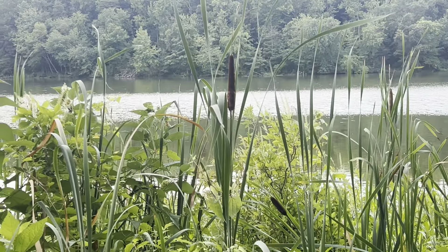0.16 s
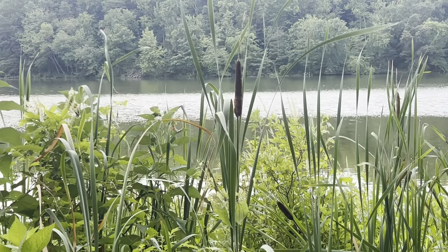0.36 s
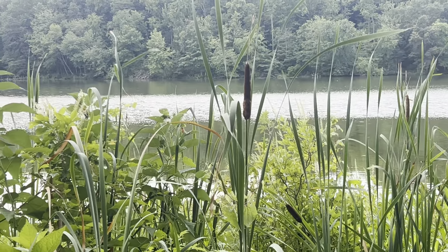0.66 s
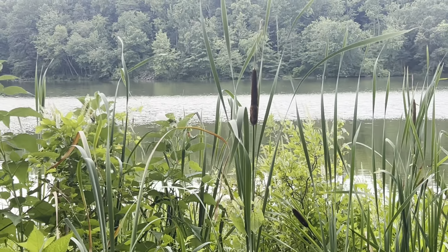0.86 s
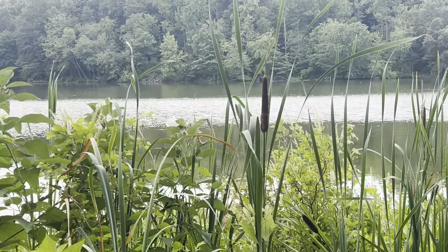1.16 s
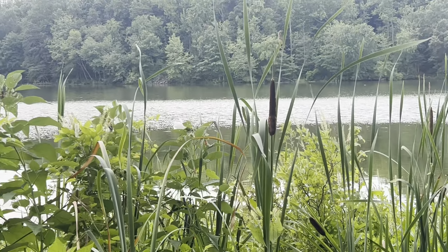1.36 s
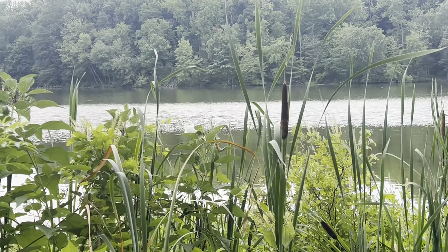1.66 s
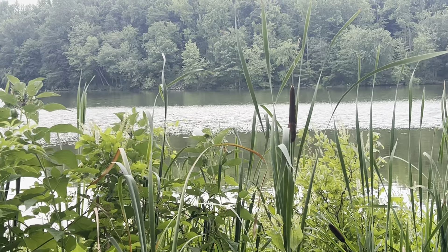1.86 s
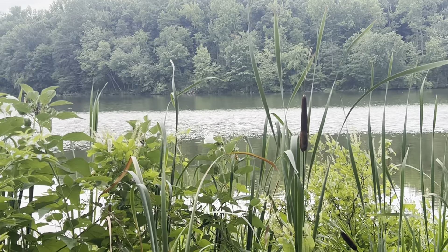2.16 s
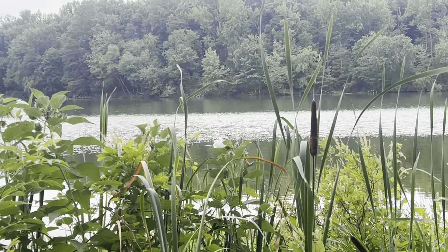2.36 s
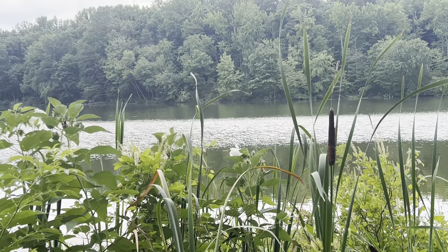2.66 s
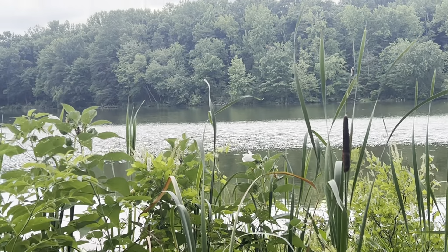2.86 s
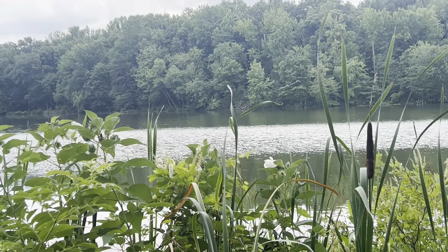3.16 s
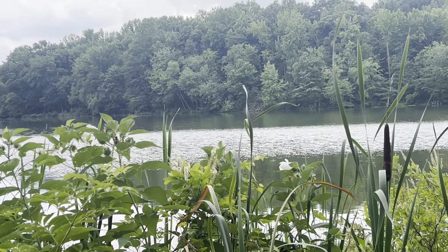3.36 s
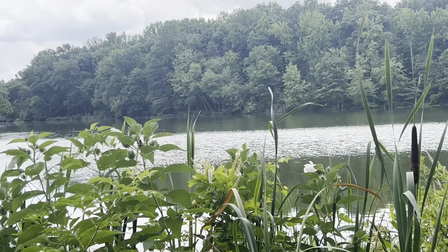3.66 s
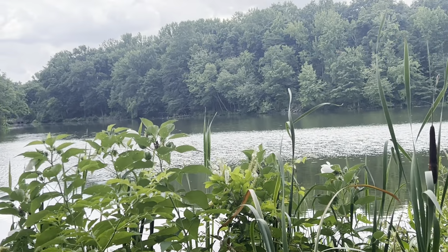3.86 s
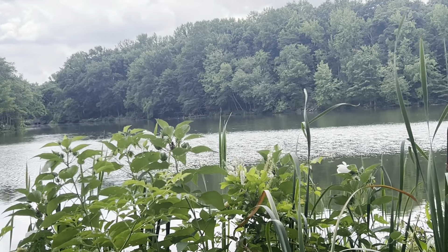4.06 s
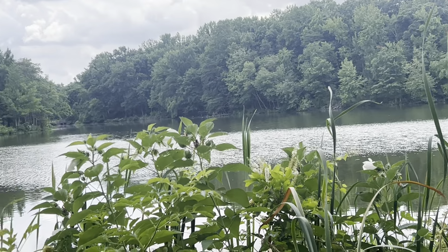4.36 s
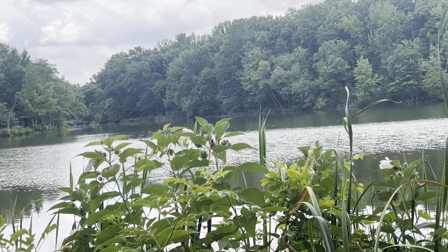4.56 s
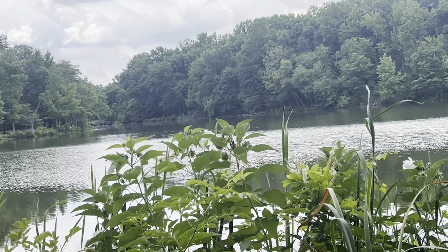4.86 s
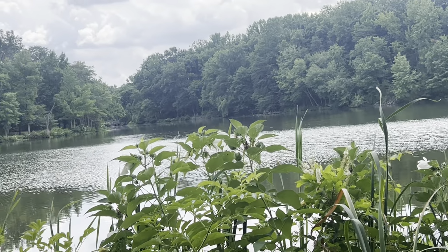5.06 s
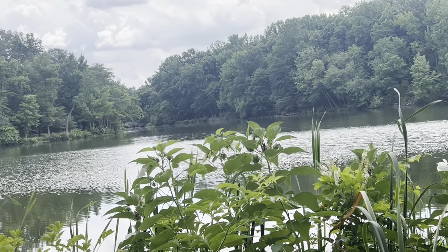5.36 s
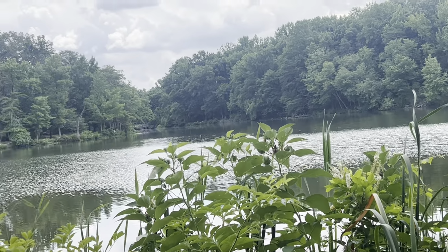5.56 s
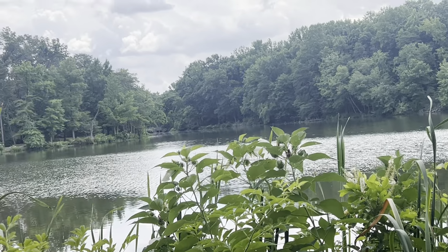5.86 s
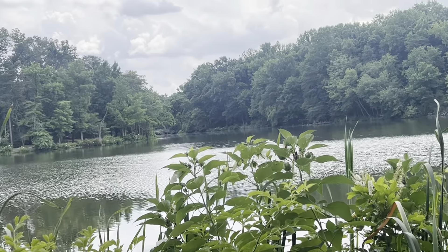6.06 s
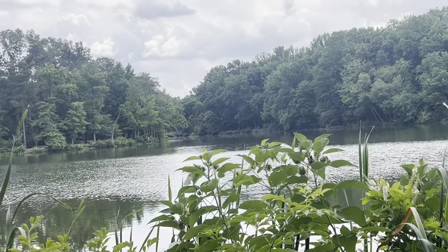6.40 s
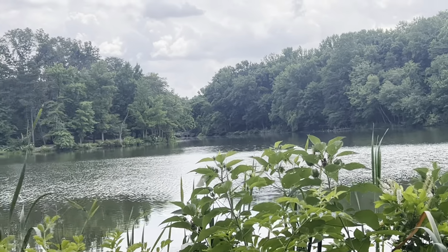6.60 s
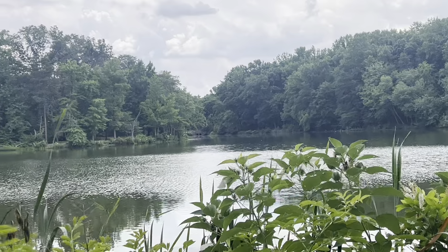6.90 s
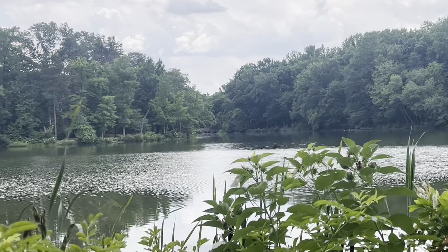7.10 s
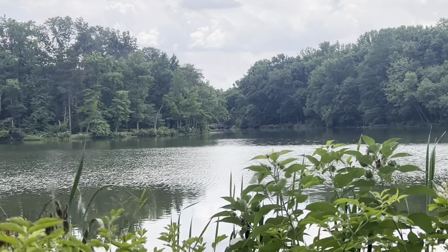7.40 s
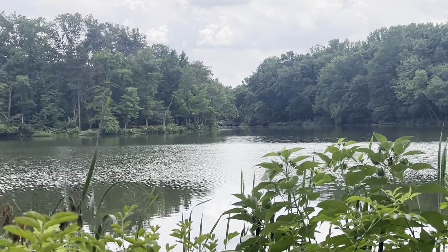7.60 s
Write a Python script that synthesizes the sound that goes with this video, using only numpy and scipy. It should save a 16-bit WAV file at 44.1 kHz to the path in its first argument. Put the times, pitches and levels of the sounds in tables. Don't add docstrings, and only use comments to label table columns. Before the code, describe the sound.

Two meadow katydids trade quick ticks and long, high dry buzzes beside a lake, over a steady cricket trill and low distant traffic rumble.

```python
import sys
import numpy as np
from scipy import signal
from scipy.fft import rfft, irfft
from scipy.io import wavfile
from scipy.ndimage import uniform_filter1d

SR = 44100
rng = np.random.default_rng(int(sys.argv[2]) if len(sys.argv) > 2 else 0)


def invert_db(level):
    return 10 ** (np.asarray(level, dtype=float) / 20)


def to_wav(sig):
    pcm = np.clip(np.atleast_2d(sig), -1, 1) * 32767
    pcm = np.round(pcm).astype(np.int16)
    wavfile.write(sys.argv[1], SR, pcm.T)


N = 341334


def evened(x):
    return x / np.sqrt(np.mean(x ** 2) + 1e-20)


def read(points, hz):
    f, value = np.transpose(points)
    return np.interp(np.log(hz + 1), np.log(f + 1), value)


def along(rows):
    s, *columns = np.transpose(rows)
    return [np.interp(np.arange(N) / SR, s, c) for c in columns]


def gate(start, end, edge_s):
    t = np.arange(N) / SR
    return np.clip(np.minimum(t - start, end - t) / edge_s + .5, 0, 1)


def resonate(x, hz, width):
    turn = np.exp(2j * np.pi * np.cumsum(hz * np.ones(len(x))) / SR)
    r = np.exp(-np.pi * width / SR)
    smooth = signal.lfilter([(1 - r) ** 2], [1, -2 * r, r * r], x / turn + 1e-18)
    return 2 * (turn * smooth).real


def coloured(x, points):
    return irfft(rfft(x) * invert_db(read(points, np.fft.rfftfreq(N, 1 / SR))), N)


def slow(per_s):
    knots = rng.standard_normal(int(N / SR * per_s) + 2)
    return evened(np.interp(np.arange(N), np.linspace(0, N, len(knots)), knots))


def reeds(x, t60, wet_db, count=3):
    t, out = np.arange(6000) / SR, x + np.zeros((2, 1))
    for k in range(count):
        tail = rng.standard_normal(6000) + .07 * rng.standard_normal((2, 6000))
        tail = tail * invert_db(-60 * t / t60) * np.minimum(t / 0.0086, 1)
        tail = tail / np.linalg.norm(tail[0])
        turn_gain = np.sqrt(2 / count) * np.cos(np.pi * (7 * np.arange(N) / SR + k / count))
        out += invert_db(wet_db) * signal.oaconvolve((x * turn_gain)[None], tail, axes=1)[:, :N]
    return out


# start_s, peak_db
TICKS = [(0.9015, -27.5), (0.9707, -27), (1.036, -27), (1.0919, -26), (1.1373, -32), (2.493, -35.5),
         (2.5441, -41.5), (2.5995, -44), (2.6898, -47), (2.7317, -39), (2.8, -36), (2.8704, -34.5),
         (2.9377, -34.5), (3.8655, -26.5), (3.9335, -24.5), (3.9985, -25), (4.0568, -26.5), (4.108, -28),
         (5.6516, -37.5), (5.7197, -36.5), (5.7844, -35), (5.8495, -39), (6.7316, -39), (6.7915, -26.5),
         (6.8605, -24.5), (6.9264, -25.5), (6.988, -24), (7.032, -30)]
# pitch_hz, width_hz, level_db, lag_turns within the stroke, far_singer_difference_db
WING = [(9040, 330, -24.5, 0.38, 0), (11200, 3140, -1.5, 0.028, -1.5), (12660, 1680, -1.5, 0.078, 0),
        (13500, 1210, 2, -0.059, -0.5), (13940, 910, 3, -0.076, -2), (15050, 1070, -1, -0.0081, 2),
        (15740, 300, -8.5, 0.12, 0)]
# start_s, end_s, effort_db, stroke_place_turns at the start
NEAR_BUZZES = [
    (1.158, 2.423, -38.5, -0.42),
    (4.122, 5.172, -40.5, .46),
    (7.059, 8.2, -36, -0.095),
]
# start_s, end_s, effort_db, stroke_place_turns at the start
FAR_BUZZES = [
    (-.05, 0.902, -46.5, -0.43),
    (2.966, 3.754, -43.5, 0.19),
    (4.695, 5.56, -51.5, 0.33),
    (5.947, 6.64, -42, 0.062),
]
# delay_s, share_gain
ECHOES = [(.0007, .2), (.0023, -.35), (.0031, .35), (.0052, .3), (.0077, -.25), (.011, .2)]


def katydids():
    teeth = (rng.random(N) < 11000 / SR) * rng.standard_normal(N)
    uneven = invert_db(0.5 * slow(60))
    ticks = lone_strokes()
    # swell dB, swell s, tiring dB, tiring s
    buzzes = [buzz(*row, per_s=46.6, shape=(6.3, 0.075, 3.1, .09), depth_db=5.5, far=False)
              for row in NEAR_BUZZES]
    buzzes += [buzz(*row, per_s=50, shape=(9.1, 0.17, 5, 0.074), depth_db=6.5, far=True)
               for row in FAR_BUZZES]
    out = np.zeros(N)
    share = np.sqrt(sum(invert_db(2 * w[2]) for w in WING))
    for k, (hz, width, db, lag, far_db) in enumerate(WING):
        drive = ticks * invert_db(0.95 * (hz - 13000) / 1000)
        for effort, turns, depth_db, far in buzzes:
            strokes = evened(invert_db(depth_db * np.cos(2 * np.pi * (turns - lag))))
            drive += effort * invert_db(far * far_db) * strokes
        ring = evened(resonate(teeth * uneven, hz, width))
        out += (-1) ** k * invert_db(db) / share * drive * ring
    out = out + sum(part * np.roll(out, round(s * SR)) for s, part in ECHOES)
    return invert_db(-1.5) * reeds(out, .07, -9.5)


def lone_strokes():
    t, ticks = np.arange(2600) / SR, np.zeros(N)
    rise_s, hold_s, fall_db_per_s = .005, 0.0031, 1000
    shape = np.minimum(t / rise_s, 1) * invert_db(-fall_db_per_s * np.maximum(t - rise_s - hold_s, 0))
    for s, db in TICKS:
        part = ticks[round((s - .004) * SR):][:len(t)]
        part += invert_db(db - 8.0) * shape[:len(part)]
    return ticks


def buzz(start, end, db, turn, per_s, shape, depth_db, far):
    t = np.arange(N) / SR
    since, left = np.maximum(t - start, 0), np.maximum(end - t, 0)
    swell_db, swell_s, tire_db, tire_s = shape
    effort_db = db - 1.5 - swell_db * np.exp(-since / swell_s) - tire_db * np.exp(-left / tire_s)
    tired_per_s, tired_s = 0.76, 0.24
    turns = turn + per_s * since - tired_per_s * np.maximum(tired_s - left, 0)
    return invert_db(effort_db) * gate(start, end, 0.031), turns, depth_db, far


# time_s, effort_db, lead_strokes ahead of an even beat
TRILL = [(0, -52.5, -0.12), (.75, -54.5, -0.09), (1.5, -55.5, 0.019), (2.3, -52.5, -0.082),
         (2.95, -55, -0.14), (3.6, -51, -0.072), (4.2, -52.5, -0.066), (5.3, -51, -0.1),
         (6.2, -54.5, -0.18), (7, -54, 0.022), (7.74, -55.5, -.1)]
# start_s, end_s, level_db against the first
ANSWERS = [
    (0.606, 1.75, -7),
    (2.7, 3.2, -7),
    (6.2, 6.75, -3),
    (7.15, 7.9, -0.5),
]


def cricket():
    effort_db, ahead = along(TRILL)
    turns = 16.1 * np.arange(N) / SR + ahead + 0.038 * slow(9)
    answer = sum(invert_db(db) * gate(start, end, 0.65) for start, end, db in ANSWERS)
    # pitch_hz, lag_turns, length_turns, level_db, share of singing
    notes = [(7647, -.1, .17, 0, 1), (7390, .08, .14, -1.5, 1), (7510, .4, .17, 0, answer)]
    song = 0
    for hz, lag, length, db, sings in notes:
        place = (turns - lag + .5) % 1 - .5
        swell = sings * np.exp(-(place / length) ** 2) * invert_db(db + 0.97 * slow(70))
        song = song + swell * np.sin(2 * np.pi * np.cumsum(hz + 40 * slow(150)) / SR)
    others = resonate(rng.standard_normal(N), 7630, 110)
    others = others + .7 * resonate(rng.standard_normal(N), 7400, 91)
    return invert_db(effort_db - 2.0) * (reeds(evened(song), 0.13, -6.5) + invert_db(-11.0) * evened(others))


# start_s, hardest_s, end_s, level_db, treble_share_db
BRUSH = [
    (2.334, 2.353, 2.4, -55.5, 5),
    (3.6, 3.674, 3.7, -54, -10),
    (6.195, 6.288, 6.3, -56.5, 11.5),
    (6.345, 6.437, 6.512, -34, 0),
    (6.525, 6.585, 6.65, -56.5, 11.5),
]
# pitch_hz, level_db
LEAF = [(600, -6), (1000, -6), (1500, 6.5), (3000, 0), (5000, 6), (8500, 6.5), (12000, 5.5), (16000, -5.5)]


def leaves():
    slip_size = invert_db(1.9 * np.minimum(rng.exponential(1, N), 3))
    crackle = (rng.random(N) < 2500 / SR) * slip_size * rng.choice([-1, 1], N)
    rub = evened(coloured(evened(crackle) + 0.31 * rng.standard_normal(N), LEAF))
    treble = resonate(rub, 8100, 5300)
    out = np.zeros(N)
    for start, hardest, end, db, treble_db in BRUSH:
        pressure_db = np.interp(np.arange(N) / SR, [start, hardest, end], [-9, 0, -9])
        pressure = invert_db(db - 2.5 + pressure_db) * gate(start, end, 0.018)
        out += pressure * (rub + (invert_db(treble_db) - 1) * treble)
    uneven_slip = invert_db(1 * slow(130))
    return reeds(out * uneven_slip + twigs(), 0.033, -10.0)


# start_s, peak_db, body_db, snap_db
TWIGS = [(2.4954, -33, -19, -6), (2.6414, -44, -19, -7.5), (3.123, -48, -4, -24), (3.5522, -48, -10, -10),
         (3.587, -55, -18, -5), (3.628, -51, -9, -20), (3.6586, -39, -10.5, -28), (3.8402, -51, -17, -10),
         (4.053, -37.5, -8.5, -21), (6.2228, -56, -15, -7), (6.232, -42, -21, -5), (6.2395, -49, -16, -7),
         (6.2648, -38, -17, -9), (6.3644, -30, -9.5, -6), (6.453, -26, -14, -6), (6.4924, -39, -12, -12),
         (6.4996, -29, -26, -7), (6.565, -43.5, -23, 5), (6.593, -35.5, -22, -6), (6.597, -39, -22, -4),
         (6.6238, -41, -15, -3), (6.9152, -54, -19, -1)]


def twigs():
    t, out = np.arange(600) / SR, np.zeros(N)
    for s, db, body_db, snap_db in TWIGS:
        push = (t == 0) + 0.22 * rng.standard_normal(len(t)) * invert_db(-60 * t / 0.0082)
        body = resonate(push, 2100, 1440) + 0.52 * resonate(push, 3420, 700)
        snap = resonate(push, 5600, 3050)
        tick = invert_db(body_db) * body / abs(body).max() + invert_db(snap_db) * snap / snap.max()
        out[round(s * SR):][:len(t)] += invert_db(db + 5.0) * tick
    return out


# pitch_hz, level_db
RUMBLE_COLOUR = [(13, -47), (22, -50), (47, -4.5), (74, -1), (129, -8), (146, -11), (183, -13), (229, -18),
                 (254, -18.5), (294, -19.5), (417, -28), (533, -29.5), (929, -33), (1550, -42.5),
                 (3000, -60), (3900, -107), (6600, -120)]
# start_s, end_s, first_pitch_hz, last_pitch_hz, level_db
DRONES = [
    (1.25, 1.6, 68, 67, -44),
    (4.55, 4.95, 68, 67, -43),
    (4.7, 6.9, 148.5, 155.8, -48.5),
    (5, 5.35, 120, 124, -49),
    (6.5, 7.9, 91, 93, -48),
    (7.0, 7.9, 153, 147, -51),
]


def traffic():
    t = np.arange(N) / SR
    out = invert_db(-41.5 + 0.0551 * t) * wash(RUMBLE_COLOUR, 2048, patchy_db=0.43)
    for start, end, first_hz, last_hz, db in DRONES:
        hz = np.interp(t, [start, end], [first_hz, last_hz])
        note = np.sin(2 * np.pi * np.cumsum(hz) / SR)
        out += np.sqrt(2) * invert_db(db) * gate(start, end, 0.52) * note
    return out


# pitch_hz, level_db per Hz
HAZE = [(1500, -7.5), (2150, -10), (2450, -20.5), (3200, -17), (3600, -13), (6800, -7), (7500, 10),
        (8500, -6.5), (10500, 0.5), (13500, -1.5), (15000, 1.5), (16500, -5.5)]


def haze():
    return invert_db(-56) * wash(HAZE, 512, patchy_db=1.5)


# pitch_hz, correlation
SAME = [(25, .985), (70, .98), (125, .945), (330, .9), (770, .42), (1800, .35), (2200, .45), (2600, .85),
        (4000, .97), (9000, .999), (16000, .999)]


def wash(points, size, patchy_db):
    hz = np.fft.rfftfreq(size, 1 / SR)
    a, b, c, d, patches = rng.standard_normal((4 * N // size + 5, len(hz), 5)).T
    patches = evened(uniform_filter1d(uniform_filter1d(patches, 10, 0), 12, 1))
    same = np.clip(read(SAME, hz), -1, 1)[:, None]
    left = a + 1j * b
    right = same * left + np.sqrt(1 - same ** 2) * (c + 1j * d)
    z = np.array([left, right]) * invert_db(read(points, hz)[:, None] + patchy_db * patches)
    return evened(signal.istft(z, nperseg=size, noverlap=3 * size // 4)[1][:, :N])


def scene():
    return katydids() + cricket() + leaves() + traffic() + haze()


def band_limit(x):
    return signal.sosfilt(signal.butter(12, 16970, fs=SR, output="sos"), x)


# pitch_hz, level_db
BALANCE_DB = [(60, -.3), (250, -.8), (1200, -1), (2200, -2), (3000, 0), (16000, 0)]
# pitch_hz, lead_turns
PORTS = [(0, 0), (1300, .05), (2600, -.07), (3200, 0), (7000, 0), (7600, -.075), (8200, 0), (8650, 0),
         (9500, .39), (10000, .46), (10350, .52), (11900, .98), (12300, 1.04), (13830, 1.5), (15500, 2)]


def record(dry):
    hz = np.fft.rfftfreq(N, 1 / SR)
    half = invert_db(read(BALANCE_DB, hz) / 2) * np.exp(-1j * np.pi * np.interp(hz, *np.transpose(PORTS)))
    top = invert_db(-45 * np.clip((hz - 15790) / 140 + .5, 0, 1))
    bottom = 1 / np.sqrt(1 + (34 / (hz + 1)) ** 8)
    mix = irfft(rfft(dry) * [half, 1 / half] * top * bottom, N)
    return band_limit(mix)


dry = scene()
out = record(dry)
to_wav(out)
```